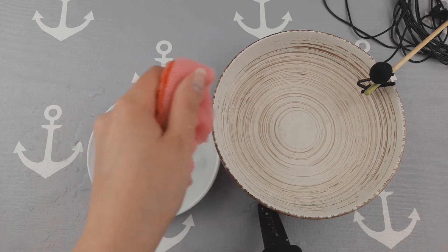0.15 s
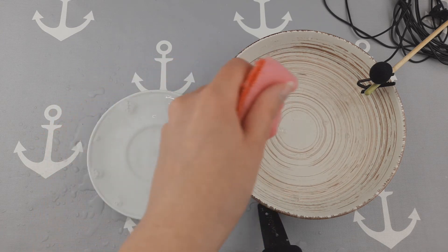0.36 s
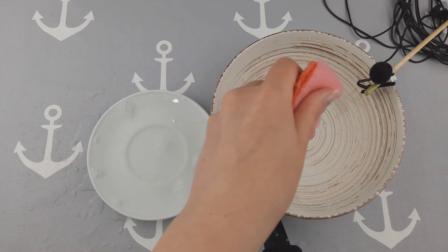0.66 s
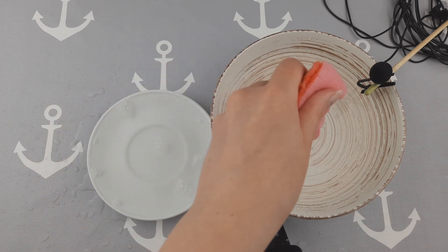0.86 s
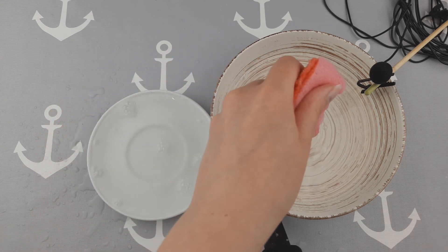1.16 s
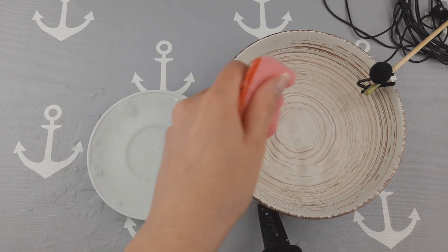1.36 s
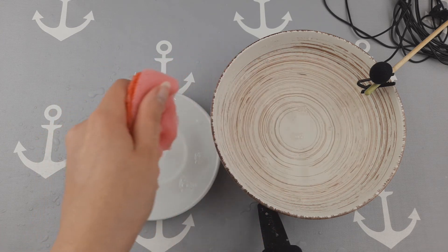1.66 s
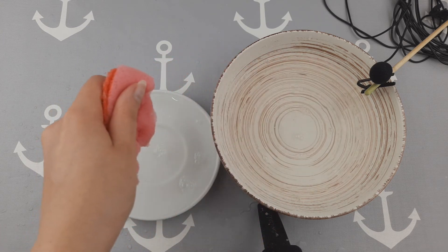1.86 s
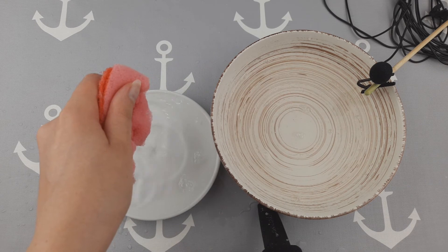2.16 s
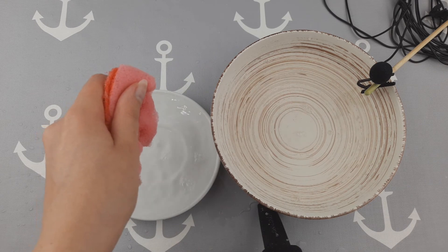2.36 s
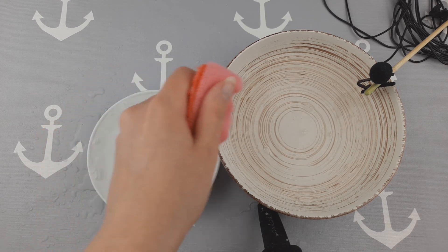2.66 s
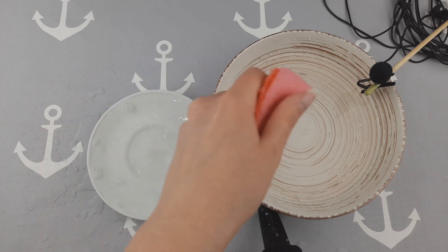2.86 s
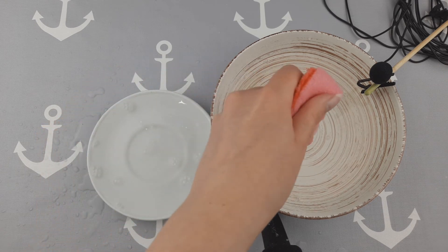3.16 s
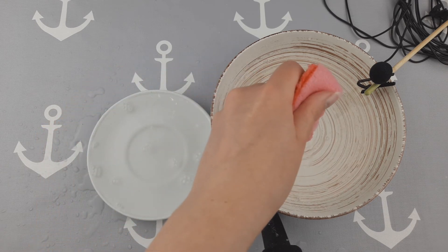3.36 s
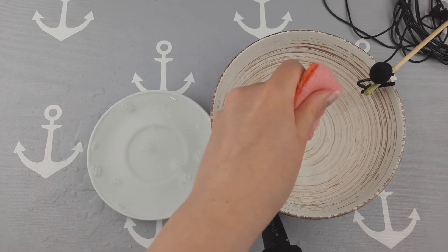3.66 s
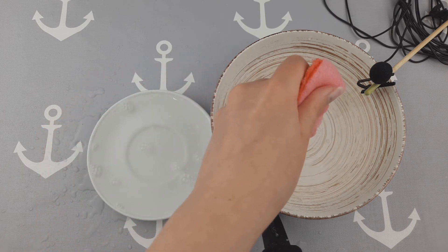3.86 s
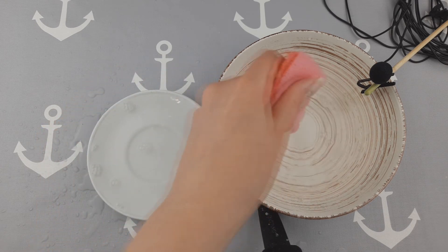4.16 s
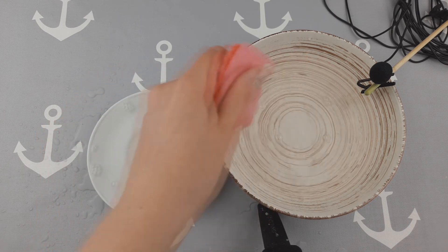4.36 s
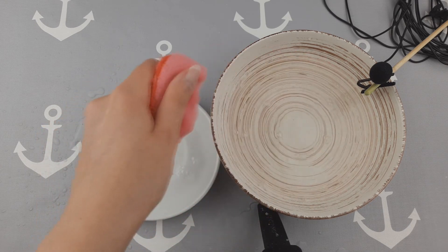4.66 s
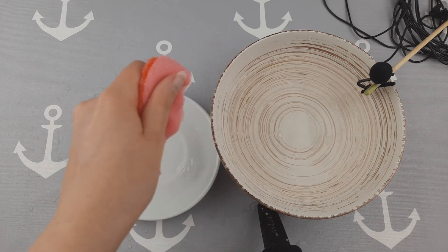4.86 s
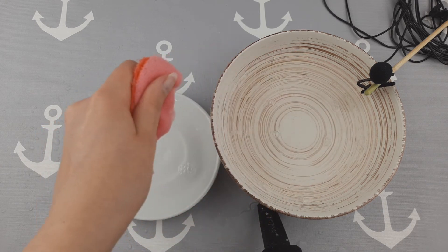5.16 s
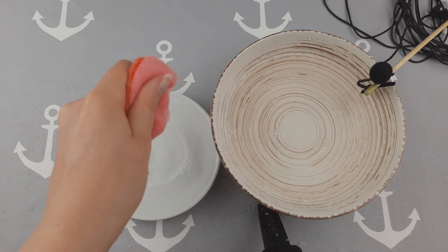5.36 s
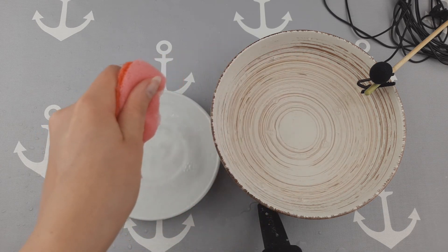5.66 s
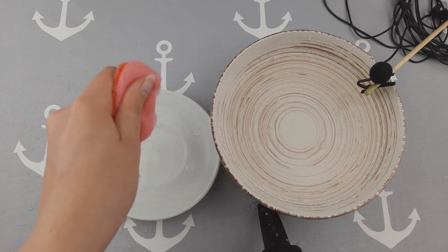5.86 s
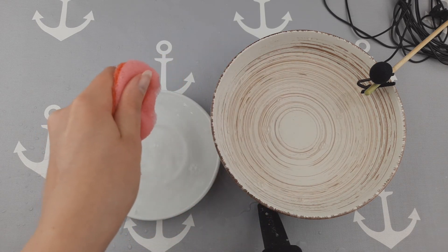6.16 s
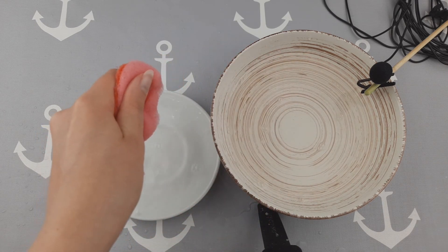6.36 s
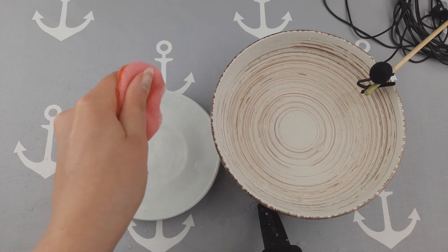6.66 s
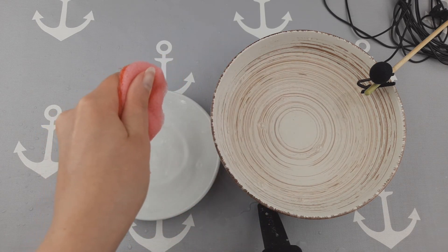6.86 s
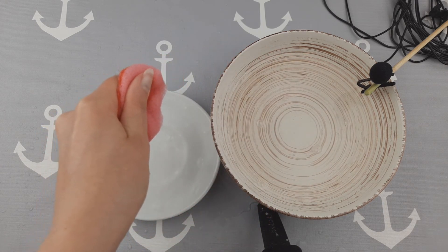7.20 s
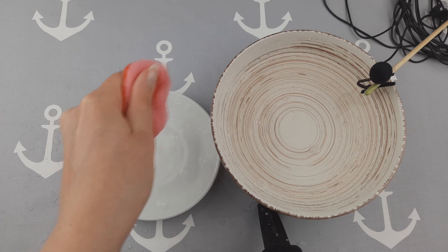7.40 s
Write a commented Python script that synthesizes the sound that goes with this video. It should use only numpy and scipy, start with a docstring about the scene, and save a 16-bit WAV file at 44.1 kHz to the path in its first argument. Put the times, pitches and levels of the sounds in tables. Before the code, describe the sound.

A wet sponge is squeezed over ceramic dishes, water splatting, plinking and bubbling in uneven bursts, ending in faint drips over a low wavering hum.

```python
"""Tabletop, close to a small microphone: a wet sponge is squeezed by turns over a ceramic bowl and a saucer.
Drops splat as short bursts of coloured noise and knock the dish, whose modes ring as decaying sines.
Bubbles, short dish rings and low thumps sound as damped sines, many sliding in pitch.
Faint drips chirp and tap the saucer near the end.
The sponge crackles as random resonant pops in fizz; a low wavering hum and a faint hiss lie underneath."""
import sys
import numpy as np
from scipy import signal
from scipy.fft import rfft, irfft, next_fast_len
from scipy.io import wavfile

SR = 44100
rng = np.random.default_rng(int(sys.argv[2]) if len(sys.argv) > 2 else 0)


def file_out(sig):
    """Save sig as 16-bit WAV at sys.argv[1]."""
    # one column per channel
    cols = np.atleast_2d(sig).T
    # limit, then scale
    lim = np.clip(cols, -1, 1)
    pcm = np.round(lim * 32767).astype(np.int16)
    wavfile.write(sys.argv[1], SR, pcm)


N = 332073

# room air and hiss, spectrum: freq_hz, density_db (per Hz, relative)
AIR_SPECTRUM = [(18, -39), (30, -15.5), (154, -2), (306, -12.5), (420, -13.5), (562, -25), (641, -20),
                (858, -29.5), (1150, -27.5), (1490, -33), (1700, -28.5), (1890, -33.5), (8310, -39),
                (14800, -41.5), (16500, -53.5)]
# hum levels, interpolated: time_s, upper_hum_db, deep_rumble_db
HUM_LEVELS = [(0.0, -59, -59), (0.88, -52, -57.5), (0.94, -40.5, -48), (1.07, -50, -51), (1.13, -36, -47),
              (1.51, -58, -56.5), (2.12, -54, -61.5), (3.21, -59, -58.5), (5.16, -50.5, -59),
              (5.47, -62, -56.5), (5.51, -50, -61.5), (6.25, -52, -47.5), (6.67, -56, -55.5),
              (6.75, -45, -54), (6.98, -58.5, -56), (7.19, -40.5, -49), (7.28, -58.5, -61),
              (7.53, -45.5, -50)]
# upper hum resonances: freq_hz, width_hz, level_db
UPPER_HUM_TONES = [(147.8, 12, 2), (158.8, 4, -4.5), (227, 40, -7.5), (416.5, 4.5, -18), (676, 22, -33)]
# deep rumble resonances: freq_hz, width_hz, level_db
DEEP_RUMBLE_TONES = [(58.8, 22, -0.5), (105.7, 8.5, 1)]
# bouts of foam crackle: peak_s, peak_db, fade_db_per_s
CRACKLE_BOUTS = [(0, -56, 78), (0.902, -52, 180), (1.26, -46.5, 112), (2.12, -61.5, 93),
                 (2.52, -54.5, 148.5), (2.76, -58, 84), (3.46, -56.5, 49.5), (3.58, -74, 104),
                 (4.181, -46.5, 104.5), (4.36, -60, 63), (4.52, -65.5, 114), (5.2, -75, 87.5),
                 (6.249, -69, 13), (6.802, -75, 37), (7.53, -54, 96)]
# foam crackle, spectrum: freq_hz, density_db (per Hz, relative)
FOAM_SPECTRUM = [(880, -41.5), (1500, -10.5), (2090, -11.5), (3220, -18), (5700, -4.5), (7850, -3),
                 (15200, -8.5), (16000, -11), (16500, -31)]
# spans when drops fall in the bowl, else on the saucer: start_s, end_s
BOWL_SPANS = [(.3, 1.55), (2.7, 4.5)]
# bowl modes: freq_hz, level_db, t60_s
BOWL_MODES = [(1770, 0, 0.091), (2162.4, 4.5, 0.22), (3050, 6, 0.16), (3758, 2.5, 0.31), (4894, 5, 0.083),
              (5680, -5.5, 0.11), (7380, -1.5, .16), (7660, 3.5, 0.026), (9000, -3, 0.12),
              (10300, -4, 0.049), (12200, -6.5, .1)]
# saucer modes: freq_hz, level_db, t60_s
SAUCER_MODES = [(1853, -2, 0.23), (3730, 2.5, 0.16), (3810, 2, 0.35), (4120, 7, 0.09), (5874, -3.5, 0.075),
                (6350, -3.5, 0.044), (9300, -16.5, .07), (13400, -5, 0.084)]
# drops landing: start_s, crack_peak_db, centre_hz, knock_db (on the dish, relative to the crack)
DROP_SPLATS = [(0.0384, -30, 6500, -54), (0.819, -42.5, 7050, -40), (.87, -29.5, 6040, -34),
               (0.891, -28, 3050, -27), (0.898, -16.5, 7500, -40), (.8988, -17, 4800, -36),
               (.923, -16, 9100, -50), (0.9522, -21, 7900, -47), (0.965, -15.5, 9500, -54),
               (.9855, -24, 7950, -53), (1.054, -29, 4950, -47.5), (1.076, -20, 10900, -49),
               (.978, -29.5, 11500, -40.5), (1.099, -24, 13500, -51), (1.0985, -26.5, 4900, -33),
               (1.1324, -23.5, 6800, -58), (1.16, -32, 7440, -42), (1.1758, -21, 7200, -47),
               (1.2262, -24, 7200, -47), (1.2276, -34, 2930, -28), (1.249, -21, 7440, -39.5),
               (1.273, -20, 7370, -34), (1.3283, -33, 6940, -48), (1.3528, -32.5, 8800, -47),
               (1.4246, -42, 9980, -45), (1.4408, -43, 8870, -45.5), (2.0938, -37.5, 5560, -31.5),
               (2.1145, -23.5, 5330, -37), (2.119, -38, 12000, -26), (2.12, -41, 1840, -28.5),
               (2.171, -39, 13400, -55), (2.3534, -31.5, 5870, -36), (2.4723, -40.5, 5820, -35),
               (2.514, -31, 6030, -52.5), (2.494, -40, 12000, -51.5), (2.5948, -45.5, 9000, -51.5),
               (2.6474, -39, 10100, -40), (2.7452, -39.5, 8700, -40), (2.7791, -38, 8130, -42.5),
               (2.9232, -46, 7660, -50.5), (3.3613, -33.5, 8600, -39), (3.3917, -44.5, 8870, -46),
               (3.442, -24.5, 8900, -26), (3.445, -34.5, 2120, -28), (3.457, -33, 3050, -33),
               (3.5073, -32, 5840, -21), (3.5538, -32.5, 4700, -25), (3.5531, -14, 8300, -35),
               (3.57, -18.5, 10900, -33), (3.591, -29, 7000, -40), (3.6324, -35, 4560, -51),
               (3.6503, -29, 4420, -31), (3.6686, -22, 6800, -41), (3.7449, -41.5, 7680, -38),
               (3.9447, -28, 7700, -17), (4.0277, -8.5, 7450, -63), (4.163, -40, 6480, -54),
               (4.1764, -24, 7260, -41), (4.2146, -27, 5600, -64), (4.218, -37.5, 2080, -21.5),
               (4.2635, -28.5, 9000, -48.5), (4.3291, -35.5, 9350, -46.5), (5.175, -44.5, 5300, -37.5),
               (5.2009, -42.5, 8730, -48.5), (5.3602, -28.5, 5940, -36.5), (5.364, -38, 4100, -26.5),
               (5.4446, -42.5, 5900, -40), (5.5474, -31, 6240, -40), (5.6778, -40, 6900, -57),
               (5.8066, -31.5, 5930, -28.5), (5.876, -35.5, 5890, -33.5), (5.9848, -35.5, 5120, -29),
               (5.985, -51, 2010, -33), (6.034, -35, 4250, -33.5), (6.034, -51, 1920, -33),
               (6.096, -41, 6300, -32), (6.097, -42, 1950, -31), (6.156, -43.5, 4040, -38.5),
               (6.2528, -35, 6350, -26), (6.2674, -21, 4800, -39), (6.256, -36.5, 12000, -50),
               (6.347, -44, 9000, -50), (6.3676, -39.5, 5640, -39), (6.47, -40.5, 4100, -31),
               (6.4921, -46, 4530, -37), (6.546, -39, 4500, -38), (6.549, -37, 12100, -50),
               (6.585, -40.5, 4550, -33.5), (6.6683, -38.5, 6150, -22), (6.7047, -48, 6340, -30),
               (6.766, -27.5, 6050, -32), (6.796, -34, 11500, -48), (6.872, -51, 6300, -18),
               (6.9237, -54, 6030, -46), (6.951, -27, 14000, -40), (7.005, -35.5, 5640, -31.5),
               (7.136, -33, 5870, -32), (7.1557, -28.5, 6100, -41), (7.211, -26, 6440, -32),
               (7.226, -44, 3900, -31), (7.293, -29.5, 7400, -32), (7.3158, -36, 5780, -33),
               (7.3721, -33.5, 5160, -48), (7.449, -46.5, 6260, -15.5), (7.4806, -41, 5400, -32)]
# water and dish tones: sliding bubbles, steady short dish rings, a few low thumps:
# start_s, pitch_hz, peak_db, t60_ms, rise_per_s (share of pitch)
WATER_AND_DISH_TONES = [(0.819, 3960, -40, 30, -3.5), (.8759, 2940, -34, 90, -8.5),
                        (0.8902, 2000, -18.5, 5.2, -34), (.89, 910, -42, 18, -3),
                        (0.8897, 1512, -24.5, 140, 1.5), (.889, 3630, -21, 2.2, -15),
                        (.8989, 2340, -29.5, 77, -5), (0.8993, 4840, -15.5, 67, 0),
                        (0.9226, 3040, -25, 20, 41), (0.9487, 1810, -29, 28, -8),
                        (.966, 1670, -24.5, 33, 4), (0.9651, 2740, -14.5, 11, 27),
                        (0.966, 3620, -18, 2.6, -15), (0.9718, 2970, -25, 38, 5),
                        (0.985, 2440, -26, 27, -.5), (0.985, 1630, -31, 28, -1),
                        (.9881, 3318, -25, 20, -10.5), (0.9901, 3605, -27, 12, 41),
                        (1.0541, 1630, -13.5, 40, 8), (1.059, 1810, -23, 19, 27),
                        (1.0633, 2900, -33, 64, 7), (1.0741, 1537, -20.5, 74, 7), (1.079, 3980, -33, 13, 4),
                        (1.098, 1750, -22, 52, -1), (1.159, 3080, -35.5, 65, -2),
                        (1.1589, 1754, -20.5, 49, -3), (1.226, 1880, -29, 23, 24),
                        (1.2276, 4030, -29, 6.5, -3), (1.23, 3066, -28, 30, 3.5),
                        (2.083, 2190, -51.5, 25, -4), (2.113, 2280, -39, 30, -4),
                        (2.116, 3827, -16.5, 68, 1), (2.1187, 1405, -23, 99, 1.5),
                        (2.22, 1352, -39.5, 85, -3), (2.2242, 1162, -43.5, 100, 5),
                        (2.2834, 1996, -50, 50, 25), (2.318, 1920, -33.5, 16, 3),
                        (2.352, 1956, -38.5, 58, -3.5), (2.375, 1910, -51.5, 19, 25),
                        (3.443, 873, -46.5, 30, -3), (3.4445, 2492, -14.5, 15, -5),
                        (3.4503, 2480, -25.5, 20, 4.5), (3.4544, 2460, -15.5, 12.3, 42),
                        (3.503, 3040, -23, 9.7, 0), (3.5165, 2679, -30, 31, -13),
                        (3.5523, 5600, -40, 23, -1), (3.555, 870, -49.5, 25, -1),
                        (3.5548, 2350, -23.4, 33, -3.5), (3.572, 4780, -34, 47, 0.5),
                        (3.5905, 2225, -26.5, 83, -1.5), (3.592, 904, -52, 40, 1),
                        (3.591, 3320, -26, 15, 1), (3.5956, 3800, -35, 9.7, 43),
                        (3.6342, 1890, -21, 4.1, 10), (3.6338, 1513, -20.5, 94, 2),
                        (3.6455, 1610, -33, 39, 0), (3.67, 1650, -31, 40, 8), (3.68, 1795, -42.5, 24, 42),
                        (3.9475, 1335, -39.5, 56, -5), (3.9586, 7380, -24, 27, -3.5),
                        (4.0274, 1360, -28, 25, -12), (4.0282, 3990, -17, 5.4, -33),
                        (4.0332, 3820, -28, 18, 40), (4.0315, 1333, -15.5, 41, 39),
                        (4.136, 2770, -54, 30, -14), (4.2177, 1930, -29, 30, 5),
                        (4.218, 2240, -19, 10.3, 5), (4.2186, 3200, -28, 14, -23),
                        (4.2269, 2220, -29.5, 19, 14), (4.2318, 2309, -29.5, 20, -1.5),
                        (5.3629, 5910, -36, 9.2, 2), (5.3619, 3833, -23, 63, -1),
                        (5.438, 2480, -54, 11, -6), (5.494, 3200, -48, 15, 5),
                        (5.5467, 1290, -25, 72, -1.5), (5.5652, 2560, -38, 2.6, .1),
                        (5.5679, 3860, -45.5, 68, 1), (5.5692, 1226, -38, 60, 15.5),
                        (5.63, 3180, -60, 25, 35), (5.6947, 2370, -45.5, 12, 10),
                        (5.695, 3810, -42.5, 31, -2), (5.694, 1023, -38, 99, -2),
                        (5.729, 1002, -47.5, 190, 30), (5.807, 4950, -35, 26, -3.5),
                        (5.81, 3825, -40, 125, -0.5), (5.8777, 3840, -52.5, 49, -1),
                        (5.986, 3460, -29, 14, 0), (5.997, 3250, -54, 14, 16), (6.0342, 3140, -31, 20, 2.5),
                        (6.096, 2190, -41, 44, 2.5), (6.1573, 2150, -34.5, 28, 3.5),
                        (6.1566, 1618, -29, 57, 8), (6.1873, 1718, -31, 70, 2.5),
                        (6.192, 2740, -49, 20, 23), (6.2543, 1926, -25.5, 14, 0.5),
                        (6.264, 1755, -33.5, 154, 1.5), (6.27, 4780, -34, 8.5, 24.5),
                        (6.2716, 5010, -21.5, 5.7, 17), (6.3205, 1960, -45, 40, 2),
                        (6.44, 2930, -50, 16, 1), (6.455, 1880, -34.5, 17.5, 35),
                        (6.47, 1464, -43.5, 73, 4.5), (6.505, 1650, -46.5, 41, 4),
                        (6.493, 3600, -39.5, 22, -20), (6.5457, 2868, -46, 15, 10),
                        (6.587, 1742, -30, 78, 1), (6.6018, 1834, -35, 28, 10), (6.645, 1930, -57, 40, 30),
                        (6.6679, 5900, -33, 8.3, 17), (6.678, 1415, -47, 43, -5),
                        (6.705, 5820, -34.5, 6.5, 35), (6.735, 2010, -61, 29, 17),
                        (6.748, 5720, -33.5, 8.1, 9), (6.771, 5200, -43, 43, 9),
                        (6.7855, 3600, -38, 6.4, 30), (6.7978, 4110, -40.5, 85, -1),
                        (6.87, 2340, -46.5, 35, 32), (6.8715, 2030, -43, 22, -2),
                        (6.9248, 2230, -38.5, 16, -5), (6.977, 1800, -40, 71, 1),
                        (6.9857, 4310, -38.5, 7.8, 15), (6.998, 2020, -55, 26, 38),
                        (7.0092, 1784, -37.5, 78, 1.5), (7.02, 3140, -43.5, 21, 4.5),
                        (7.07, 3200, -48, 13, -3), (7.0704, 1950, -40, 90, -3.5),
                        (7.0789, 1830, -38, 32, 4), (7.1344, 2320, -27, 10, 33),
                        (7.1358, 2530, -28, 18, 48.5), (7.138, 3480, -31.5, 25, 28),
                        (7.147, 4280, -31, 9.7, -21), (7.171, 5942, -41, 58, 7.5),
                        (7.2108, 5970, -32, 43, -1), (7.2116, 2186, -40, 36, 1),
                        (7.2256, 2140, -31.5, 19, 16.5), (7.2314, 2080, -40, 25, -11),
                        (7.302, 2330, -49, 33, 17), (7.3166, 3838, -26, 53, -1.5),
                        (7.372, 2730, -52.5, 20, 1), (7.3723, 5320, -43, 16, 3.5),
                        (7.451, 5660, -47.5, 10, 21.5), (7.4816, 4920, -48.5, 19, -7)]

AIR_DB, LOW_CUT_HZ, TOP_CUT_HZ = -56, 36., 16850
ROOM_T60_S, WALL_CUT_HZ, FIRST_ECHO_S = 0.16, 8100, 0.0013
# the saucer stands farther from the microphone, so more of the room is heard
ROOM_BOWL_DB, ROOM_SAUCER_DB = -16.75, -10.25
CRACKLE_RISE_DB_PER_S, CRACKLE_RESTING_DB = 220.5, -84.5
TONES_TO_DISH_DB = -63   # little of a bubble's pressure passes into the stiff ceramic
# a bubble that climbs fast opens up more slowly; time constant and its growth per unit of rise_per_s
SWELL_MS, SWELL_MS_PER_RISE = .9, 0.13
# faint drips as the sponge runs dry: loudest peak, steepest rise
TRICKLE_START_S, TRICKLE_END_S = 5.95, 7.5
TRICKLE_MAX_DB, TRICKLE_T60_MS, TRICKLE_MAX_RISE_PER_S = -53.5, 15, 39
TAPS_PER_S, TAP_MEDIAN_DB, TAP_SPREAD_DB = 30, -76, 8


def amp(db):
    """dB to gain."""
    return 10 ** (np.asarray(db) / 20)


def rms_one(x):
    """Scale to unit rms."""
    return x / np.sqrt(np.mean(x ** 2) + 1e-20)


def add(out, start_s, sound):
    """Mix a sound in at start_s."""
    i = min(round(start_s * SR), N)
    out[i:i + len(sound)] += sound[:N - i]


def in_time(rows):
    """Each column of a curve, sample by sample."""
    time_s, *columns = np.transpose(rows)
    return [np.interp(np.arange(N) / SR, time_s, column) for column in columns]


def coloured(x, spectrum):
    """Shape a signal by a (Hz, dB) spectrum, interpolated over log frequency; rms 1."""
    size = next_fast_len(N)
    freq_hz, level_db = np.transpose(spectrum)
    bin_hz = np.arange(size // 2 + 1) * SR / size
    gain = amp(np.interp(np.log(bin_hz + 1), np.log(freq_hz), level_db))
    return rms_one(irfft(rfft(x, size) * gain, size)[:N])


def resonance(x, hz, width_hz):
    """Two-pole band-pass with gain 1 on top."""
    r = np.exp(-np.pi * width_hz / SR)
    b = [(1 - r * r) / 2, 0, (r * r - 1) / 2]
    a = [1, -2 * r * np.cos(2 * np.pi * hz / SR), r * r]
    return signal.lfilter(b, a, x)


def drift(rate_hz):
    """Slow chance: noise twice through a one-pole low-pass; rms 1."""
    r = np.exp(-2 * np.pi * rate_hz / SR)
    noise = rng.standard_normal(N + SR)   # the first second settles the filter
    return rms_one(signal.lfilter([1], [1, -2 * r, r * r], noise)[SR:])


def room_air():
    """Steady noise shaped to the spectrum of room air and hiss."""
    return amp(AIR_DB) * coloured(rng.standard_normal(N), AIR_SPECTRUM)


def hum():
    """Noise in narrow low resonances: tones that waver and swell."""
    out = 0
    for tones, level_db in zip((UPPER_HUM_TONES, DEEP_RUMBLE_TONES), in_time(HUM_LEVELS)):
        drone = 0
        for hz, width_hz, tone_db in tones:
            narrow = resonance(rng.standard_normal(N), hz, width_hz)
            drone = drone + amp(tone_db) * rms_one(resonance(narrow, hz, 2 * width_hz))
        out = out + amp(level_db) * rms_one(drone)
    return out


def room(x):
    """Dense reflections from table and walls: decaying noise, dulled, after a short gap."""
    t = np.arange(SR // 2) / SR
    tail = rng.standard_normal(len(t)) * amp(-60 * t / ROOM_T60_S) * (t > FIRST_ECHO_S)
    tail = signal.lfilter(*signal.butter(1, WALL_CUT_HZ, fs=SR), tail)
    return signal.fftconvolve(x, tail / np.sqrt(np.sum(tail ** 2)))[:N]


def crackle_level():
    """Gain of the crackle: each bout rises fast and fades at its own pace over a resting level."""
    t = np.arange(N) / SR
    level = amp(CRACKLE_RESTING_DB)
    for peak_s, peak_db, fade_db_per_s in CRACKLE_BOUTS:
        drop_db = np.where(t < peak_s, CRACKLE_RISE_DB_PER_S * (peak_s - t), fade_db_per_s * (t - peak_s))
        level = level + amp(peak_db - drop_db)
    return level


def sponge(pops_per_s=1600.0, spread_db=9.5, ring_cycles=2.5, fizz_db=-2.0, fizz_flutter_db=1.5):
    """Foam cells burst at random, each ringing a few cycles in one of ten bands; the finest merge into fizz."""
    sizes = amp(spread_db * np.minimum(rng.exponential(1, N), 4)) * rng.choice([-1, 1], N)
    pops = sizes * (rng.random(N) < pops_per_s / SR)
    band = rng.integers(0, 10, N)
    grains = 0
    for k, hz in enumerate(np.geomspace(2500, 15500, 10)):
        grains = grains + resonance(pops * (band == k) + 1e-18, hz, hz / ring_cycles) / np.sqrt(hz)
    fizz = amp(fizz_db + fizz_flutter_db * drift(25.)) * rng.standard_normal(N)
    return crackle_level() * coloured(rms_one(grains) + fizz, FOAM_SPECTRUM)


def taps():
    """Drips tap the dish: clicks of uneven strength at random moments through the trickle."""
    t = np.arange(N) / SR
    hit = (rng.random(N) < TAPS_PER_S / SR) & (t > TRICKLE_START_S) & (t < TRICKLE_END_S)
    return hit * amp(TAP_MEDIAN_DB + TAP_SPREAD_DB * rng.standard_normal(N))


def dish(force, modes, slosh_db=4.0):
    """Each mode is a decaying sine driven by the force; the moving film of water makes it flutter."""
    out = 0
    for hz, level_db, t60_s in modes:
        r, w = amp(-60 / (t60_s * SR)), 2 * np.pi * hz / SR
        b, a = [0, amp(level_db) * np.sin(w)], [1, -2 * r * np.cos(w), r * r]
        ring = signal.lfilter(b, a, force + 1e-18)
        out = out + ring * amp(slosh_db * drift(32.0))
    return out


def splats(crack_t60_s=0.0056, width_share=.33, snap_db=-10, spray_db=-24, spray_t60_s=0.065, front=4.6):
    """A crack of noise coloured by droplet size, a bright snap and a trail of spray; the crack knocks the dish."""
    air, knock = np.zeros(N), np.zeros(N)
    n = np.arange(SR // 8)
    t = n / SR
    lead = 30   # samples of swelling before the hard front of the impact
    shape = amp(-60 * np.abs(n - lead) / SR / crack_t60_s) * np.minimum(n / lead, 1)
    for start_s, peak_db, hz, knock_db in DROP_SPLATS:
        noise = rng.standard_normal(len(t))
        burst = (noise + front * (n == lead)) * shape
        crack = resonance(resonance(burst, hz, width_share * hz), hz, 1.3 * hz)
        crack = crack / np.abs(crack).max()
        snap = amp(snap_db) * np.diff(burst, prepend=0) / 4
        spray = rms_one(resonance(resonance(noise, hz, width_share * hz), hz, 0.95 * hz))
        spray = amp(spray_db - 60 * t / spray_t60_s) * spray
        add(air, start_s, amp(peak_db) * (crack + snap + spray))
        add(knock, start_s, amp(peak_db + knock_db) * resonance(crack, hz, hz / 5))
    return air, knock


def trickle(count=45):
    """Faint drips at random moments trap small bubbles that chirp upward."""
    rows = []
    for when, small, weak, rise in rng.random((count, 4)):
        start_s = TRICKLE_START_S + (TRICKLE_END_S - TRICKLE_START_S) * when
        rows.append((start_s, 1900 * 2.6 ** small, TRICKLE_MAX_DB - 14.0 * weak,
                     TRICKLE_T60_MS, TRICKLE_MAX_RISE_PER_S * rise))
    return rows


def droplets(below_db=-22, late_s=.035, t60_ms=9., count=4):
    """A few droplets fall back after each listed tone and trap weaker, mostly higher bubbles."""
    rows = []
    for start_s, hz, peak_db, *_ in WATER_AND_DISH_TONES:
        for late, small, weak, rise in rng.random((count, 4)):
            delay_s = 0.0046 - late_s * np.log(1 - .9 * late)
            rows.append((start_s + delay_s, hz * (.85 + .5 * small), peak_db + below_db - 14 * weak,
                         t60_ms, 25 * rise))
    return rows


def water_and_dish_tones(burst_slide=1.2):
    """Damped sines: bubbles slide in pitch as they near the surface, dish rings and thumps hold steadier."""
    air, t = np.zeros(N), np.arange(SR // 8) / SR
    for start_s, hz, peak_db, t60_ms, rise_per_s in list(WATER_AND_DISH_TONES) + droplets() + trickle():
        swell_ms = SWELL_MS + SWELL_MS_PER_RISE * max(rise_per_s, 0)
        shape = (1 - np.exp(-1000 * t / swell_ms)) * amp(-60000 * t / t60_ms)
        # a bubble bursts once its pitch has slid by about this share
        burst = np.exp(-(rise_per_s * t / burst_slide) ** 6)
        tone = np.sin(2 * np.pi * hz * (t + rise_per_s * t * t / 2))
        add(air, start_s, amp(peak_db) * shape / shape.max() * burst * tone)
    return air


def scene():
    """Water, dishes and sponge in the room, over hum and air."""
    t = np.arange(N) / SR
    bowl = sum((t > start_s) & (t < end_s) for start_s, end_s in BOWL_SPANS)
    tones = water_and_dish_tones()
    crack, knock = splats()
    force = amp(TONES_TO_DISH_DB) * tones + knock + taps()
    dishes = dish(force * bowl, BOWL_MODES) + dish(force * (1 - bowl), SAUCER_MODES)
    near = tones + crack + dishes + sponge()
    room_db = ROOM_SAUCER_DB + (ROOM_BOWL_DB - ROOM_SAUCER_DB) * bowl
    return (near + room(near * amp(room_db)) + hum() + room_air())[None]


def record(dry):
    """The microphone drops the deepest bass; the top is cut."""
    x = signal.sosfilt(signal.butter(4, LOW_CUT_HZ, "high", fs=SR, output="sos"), dry)
    return signal.sosfilt(signal.cheby2(24, 70, TOP_CUT_HZ, fs=SR, output="sos"), x)


dry = scene()
out = record(dry)
file_out(out)
```